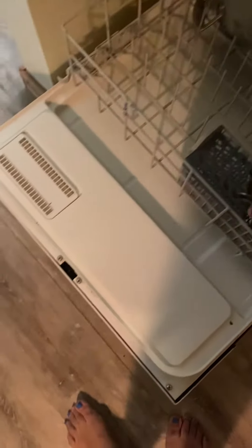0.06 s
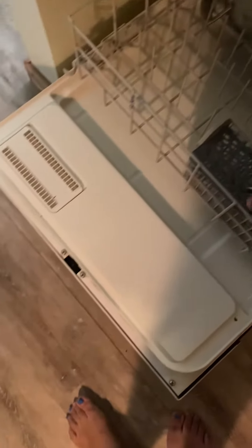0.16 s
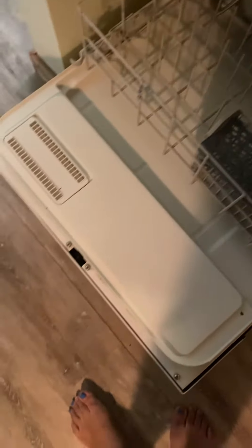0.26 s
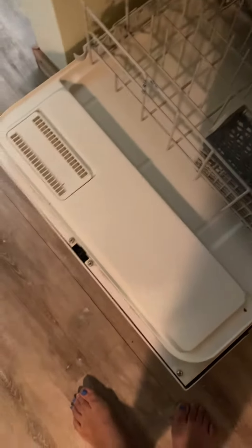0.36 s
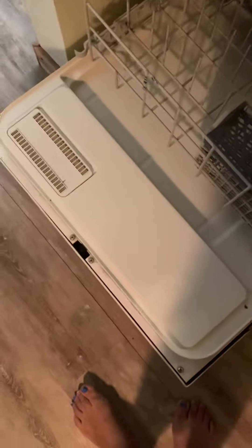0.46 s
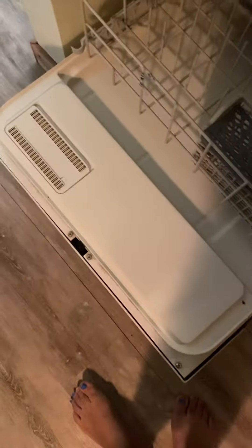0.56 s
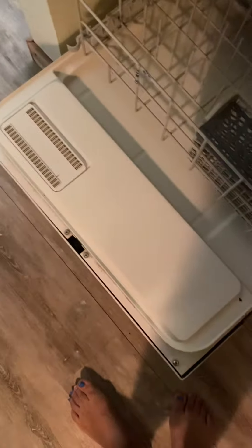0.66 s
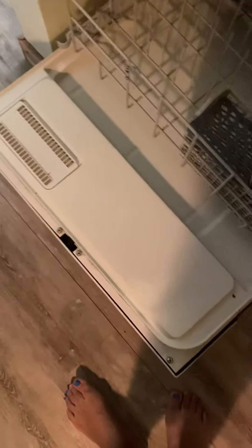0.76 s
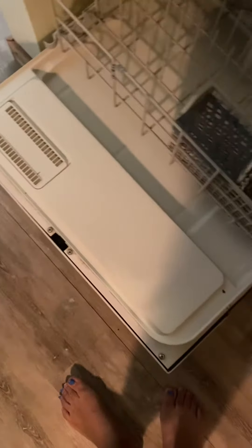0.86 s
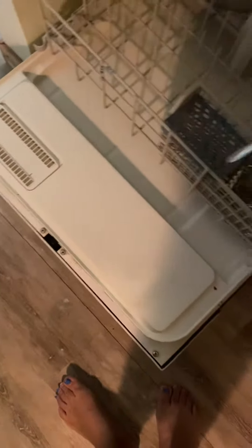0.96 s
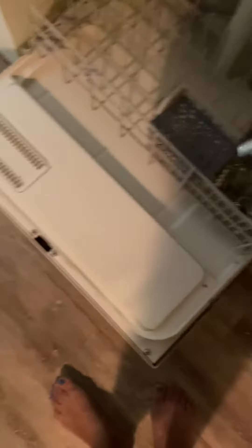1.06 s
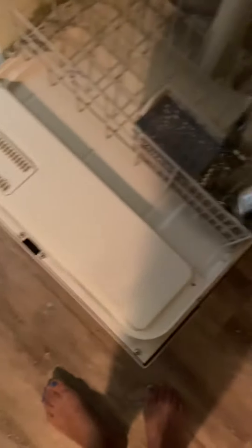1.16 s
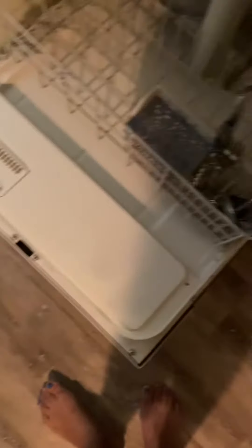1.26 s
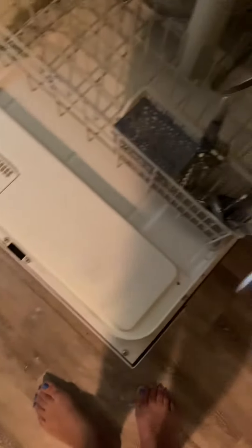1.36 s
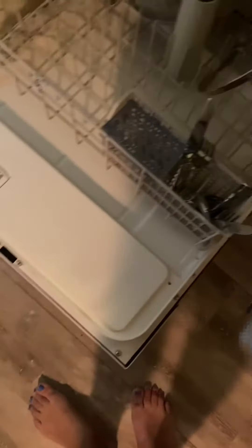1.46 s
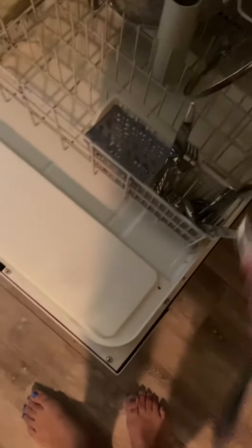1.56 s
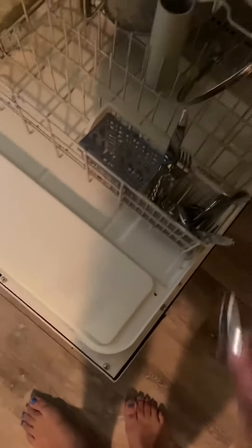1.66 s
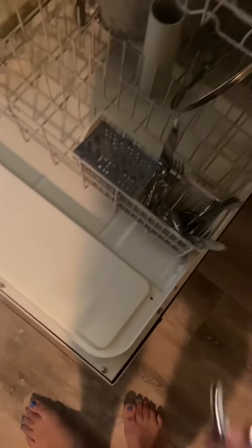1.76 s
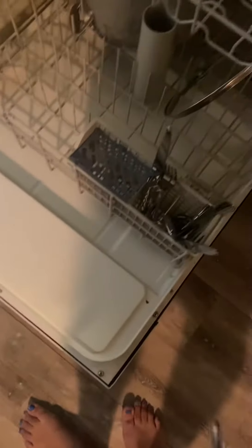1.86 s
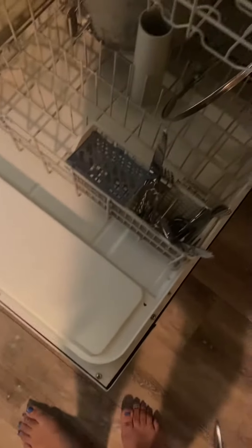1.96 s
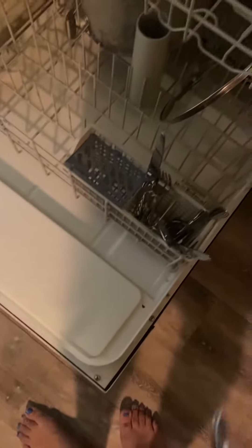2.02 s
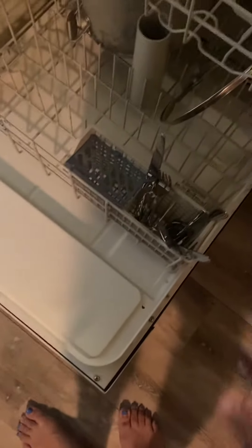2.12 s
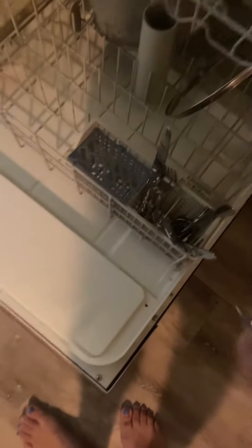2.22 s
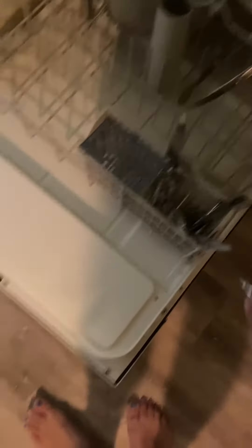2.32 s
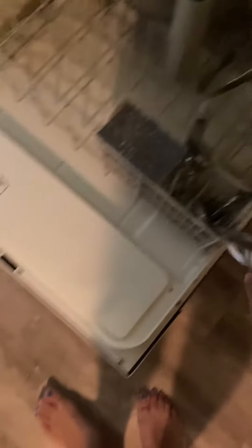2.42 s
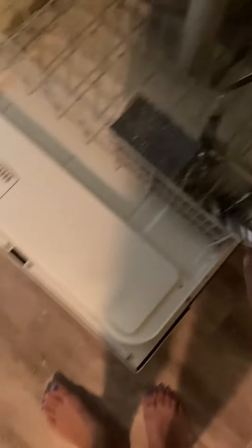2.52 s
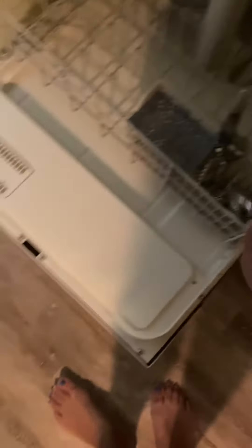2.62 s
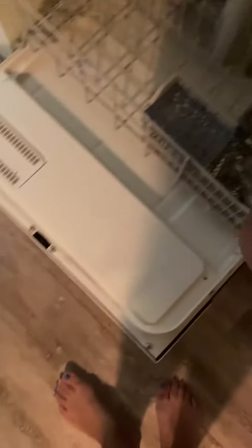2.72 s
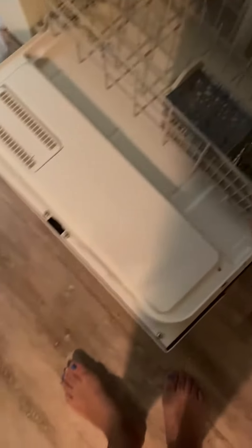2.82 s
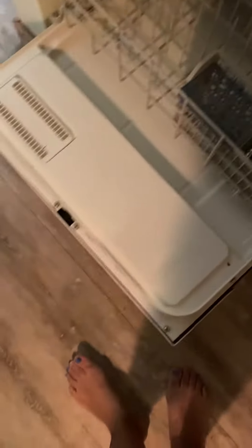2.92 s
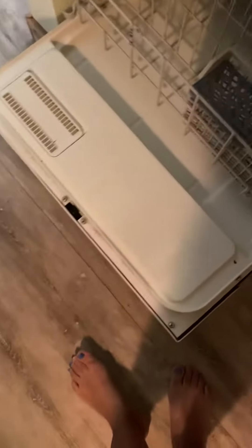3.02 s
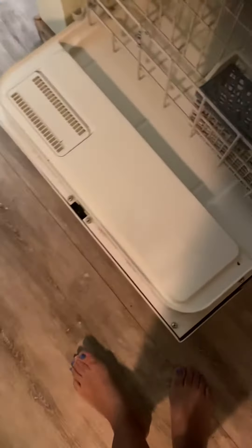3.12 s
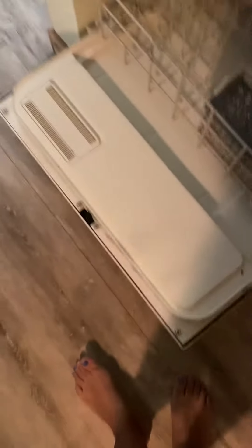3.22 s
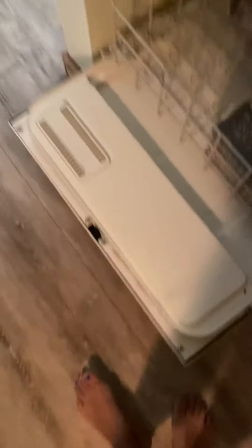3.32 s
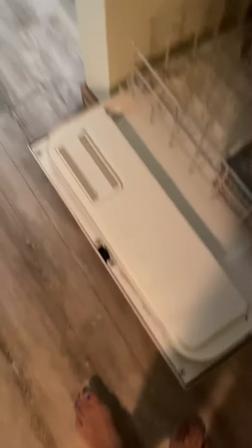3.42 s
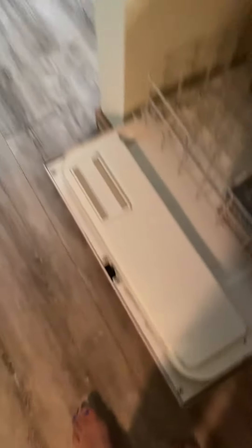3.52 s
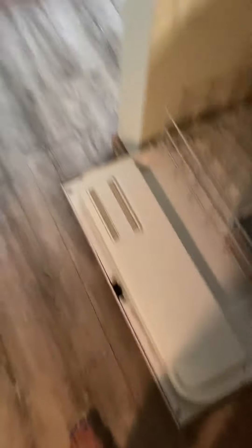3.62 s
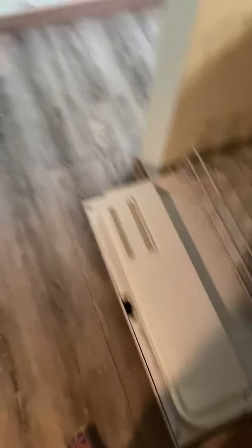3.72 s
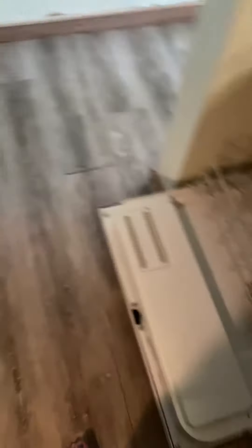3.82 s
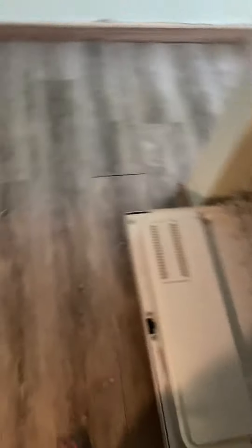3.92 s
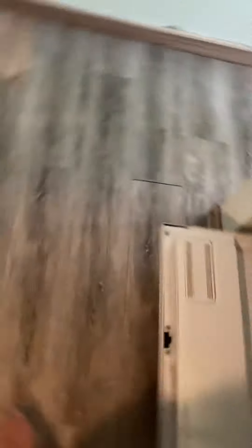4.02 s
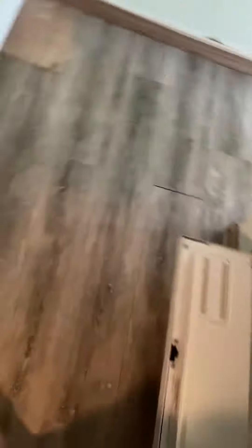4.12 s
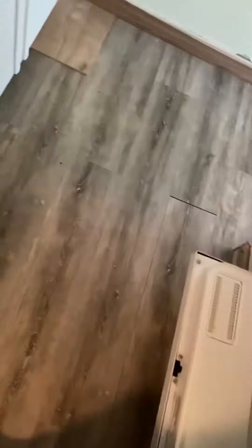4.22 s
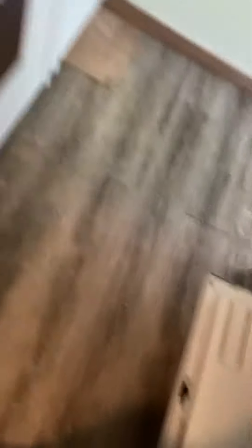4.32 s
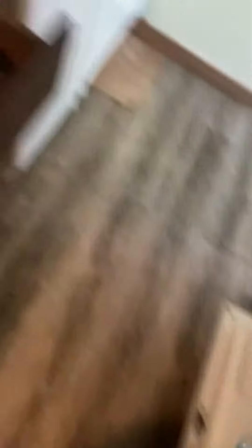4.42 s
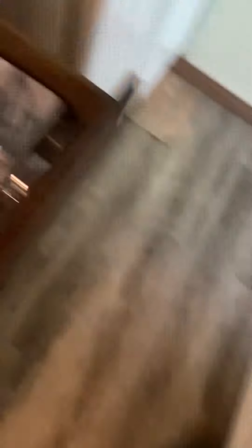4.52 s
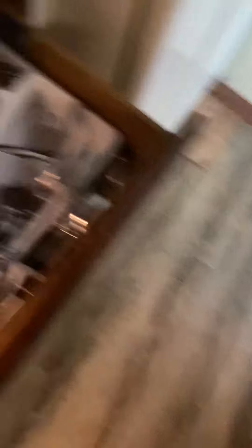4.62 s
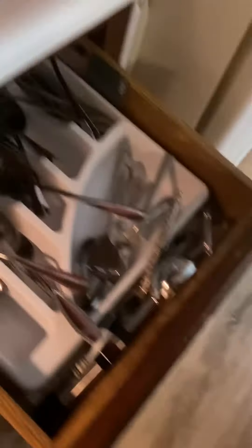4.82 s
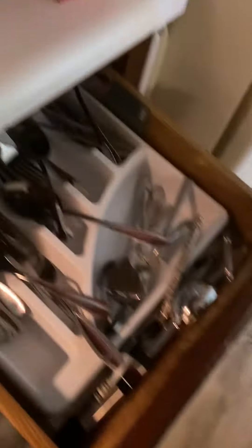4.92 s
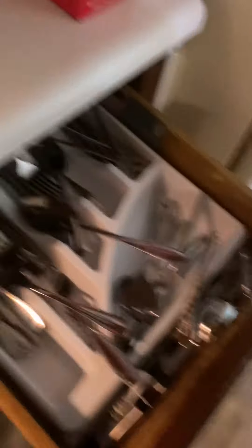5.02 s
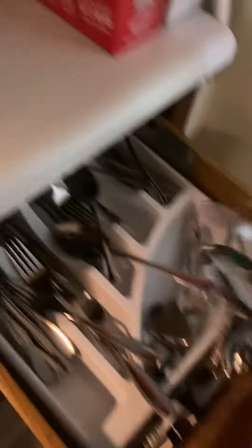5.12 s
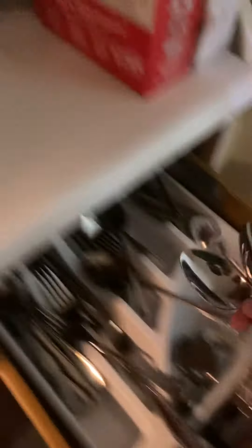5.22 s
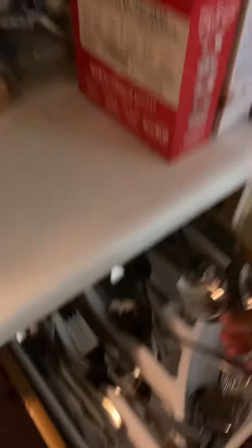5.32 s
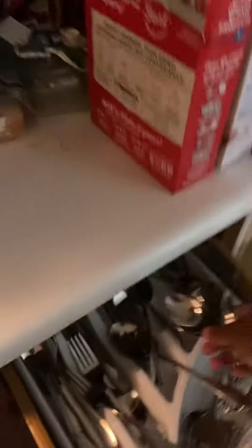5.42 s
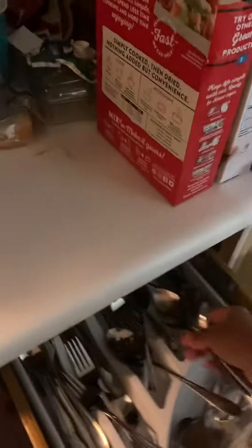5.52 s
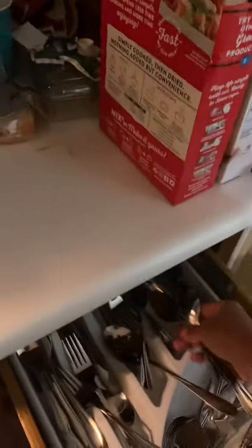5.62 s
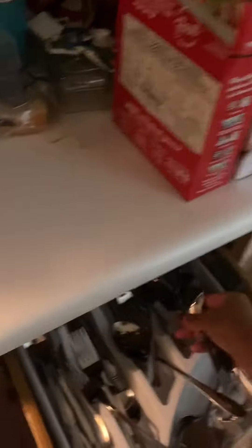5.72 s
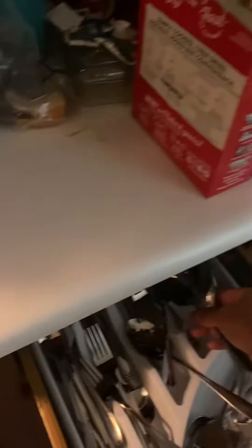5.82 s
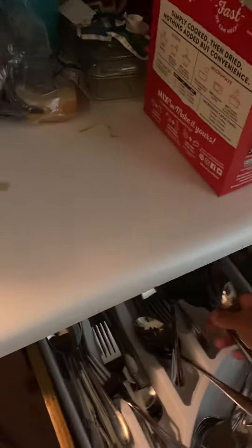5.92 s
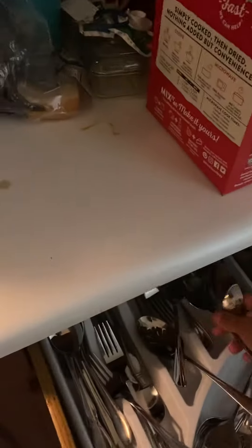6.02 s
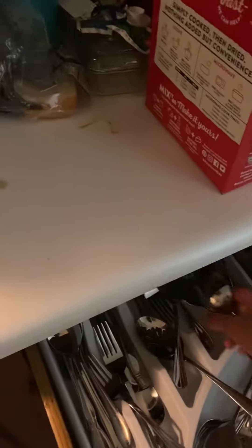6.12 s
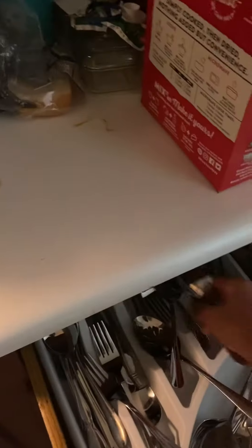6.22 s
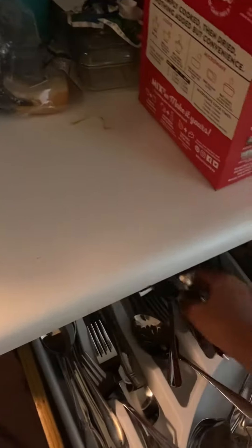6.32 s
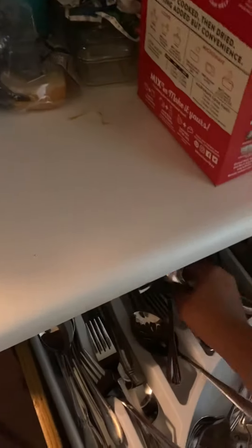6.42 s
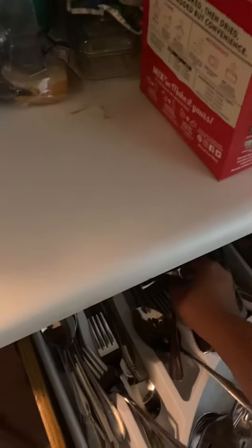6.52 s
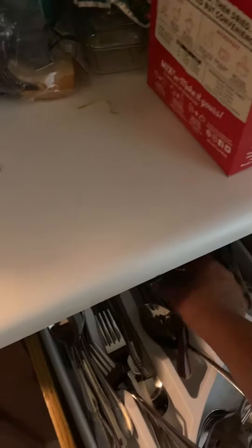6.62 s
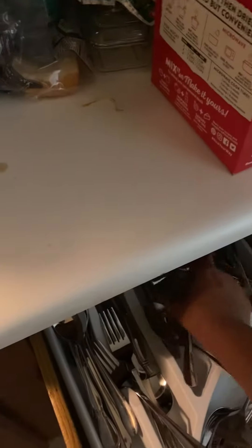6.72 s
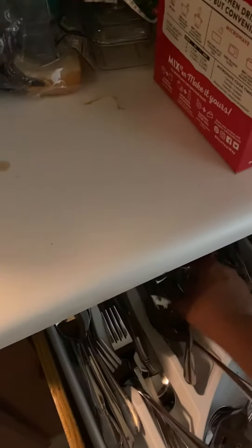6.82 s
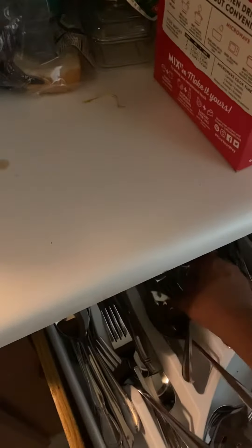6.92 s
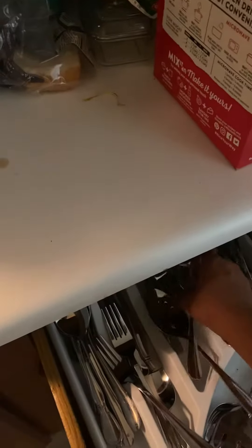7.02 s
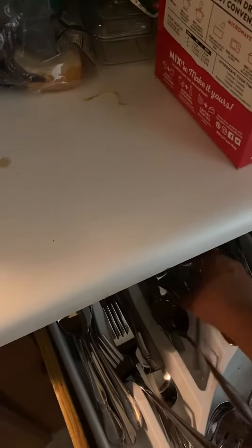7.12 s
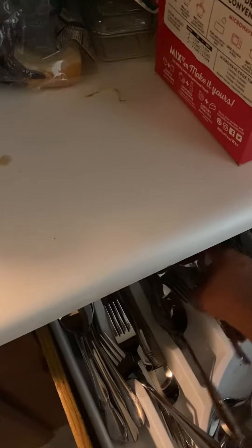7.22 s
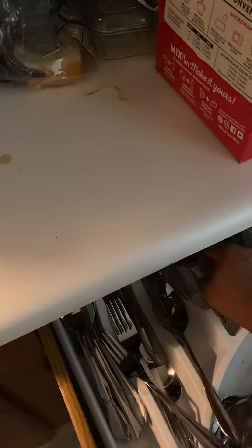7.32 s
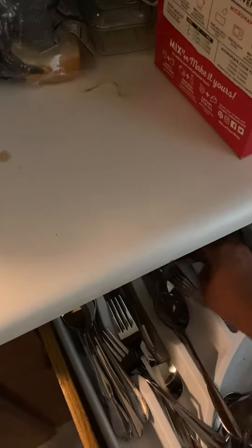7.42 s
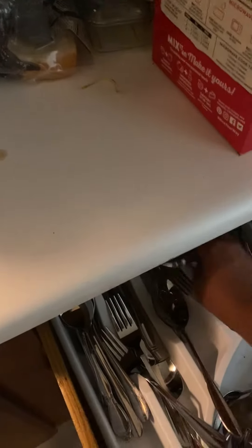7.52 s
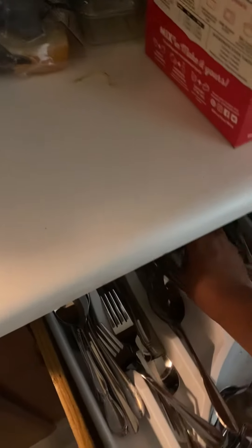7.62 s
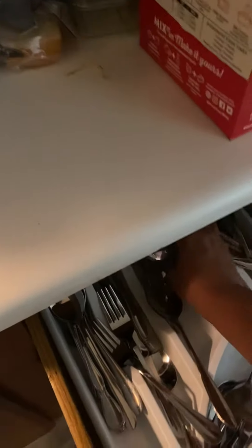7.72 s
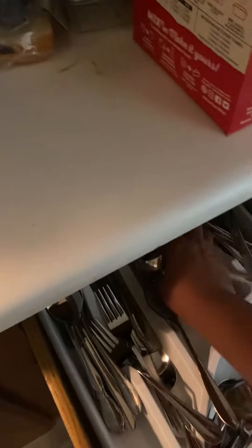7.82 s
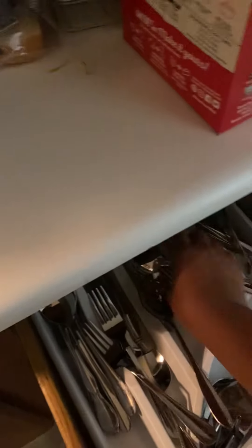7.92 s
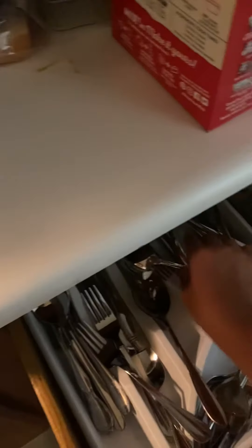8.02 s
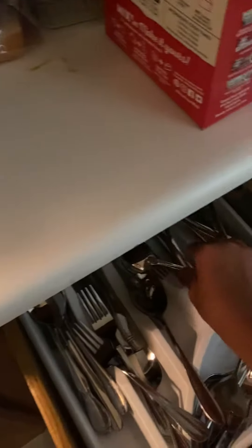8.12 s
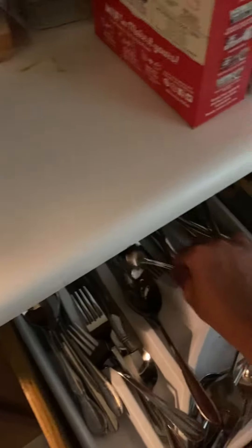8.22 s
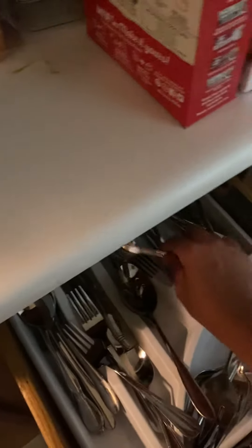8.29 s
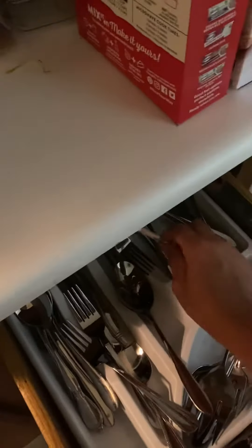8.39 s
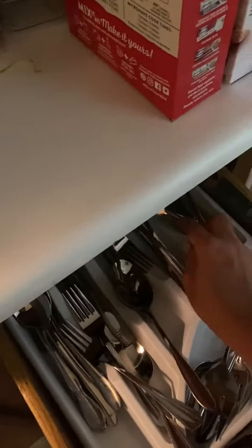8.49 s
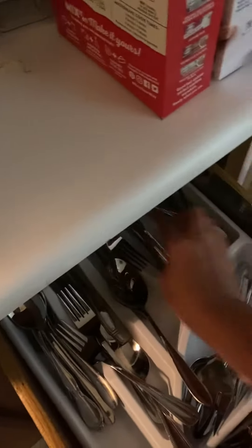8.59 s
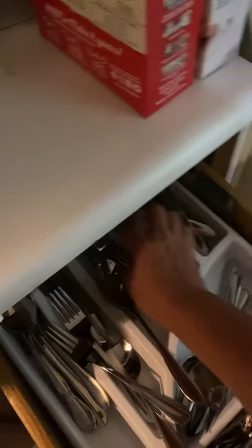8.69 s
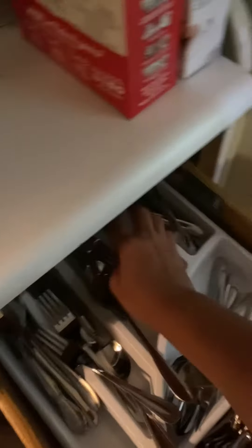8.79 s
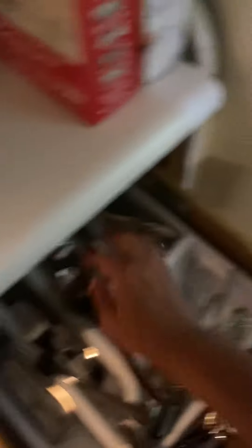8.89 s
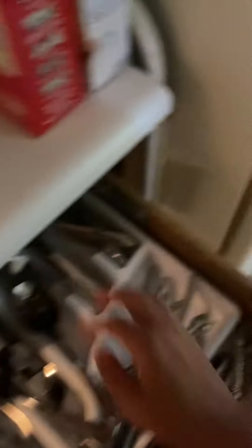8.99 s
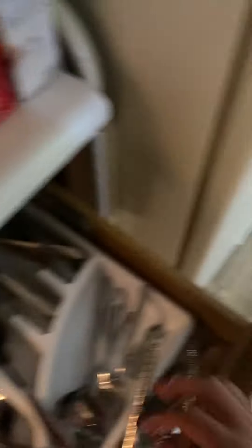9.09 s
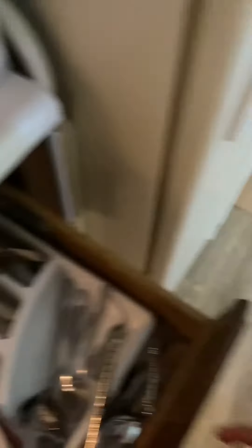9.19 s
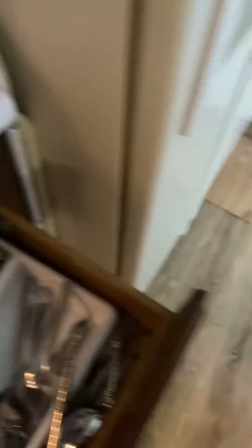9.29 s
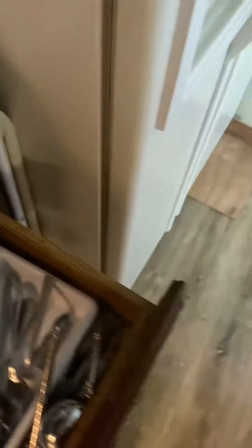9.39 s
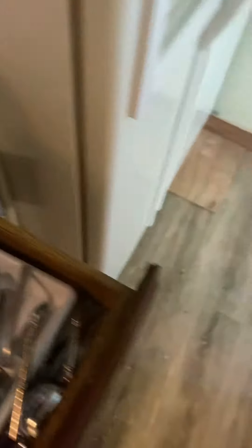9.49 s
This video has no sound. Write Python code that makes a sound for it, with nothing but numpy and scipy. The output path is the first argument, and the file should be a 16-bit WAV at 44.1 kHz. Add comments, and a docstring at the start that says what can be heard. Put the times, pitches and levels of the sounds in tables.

```python
"""A small kitchen: steel cutlery leaves a dishwasher's plastic basket and is sorted into a drawer's tray.
Each contact is a burst of tiny touches that rings the steel and knocks the plastic beneath; the room answers.
Slides tick, handles rap, brief high ticks join some contacts, free pieces sing on, and basket and drawer bump.
Wood groans softly over a low background, an appliance's hum and a faint hiss.
A hand-held phone listens; left and right drift out of phase in the treble."""
import sys
import numpy as np
from scipy import signal
from scipy.fft import rfft, irfft, next_fast_len
from scipy.io import wavfile
from scipy.ndimage import map_coordinates

SR = 44100
rng = np.random.default_rng(int(sys.argv[2]) if len(sys.argv) > 2 else 0)


def file_out(sig):
    """Save sig as 16-bit WAV at sys.argv[1]."""
    # one column per channel
    cols = np.atleast_2d(sig).T
    # limit, then scale
    lim = np.clip(cols, -1, 1)
    pcm = np.round(lim * 32767).astype(np.int16)
    wavfile.write(sys.argv[1], SR, pcm)


N = 421155
RING = np.arange(int(.34 * SR)) / SR  # the time axis of one ring (s)


def amp(db):
    """Decibels to gain."""
    return 10 ** (np.asarray(db) / 20)


def unit(x):
    """Scale to rms 1."""
    return x / np.sqrt(np.mean(x ** 2) + 1e-20)


def blow(x):
    """Scale to the energy of 30 ms at rms 1, so that short and long sounds compare."""
    return x * np.sqrt(.03 * SR / (np.mean(x ** 2) * x.shape[-1] + 1e-20))


def fade(t60):
    """An exponential decay that falls 60 dB in t60 seconds."""
    return amp(-60 * RING / t60)


def along(points, hz):
    """Join (pitch_hz, value) points on a log pitch axis."""
    f, value = np.transpose(points)
    return np.interp(np.log(hz + 1), np.log(np.sort(f) + 1), value)


def curve(rows):
    """Join (time_s, value) points into one value per sample."""
    time_s, value = np.transpose(rows)
    return np.interp(np.arange(N) / SR, time_s, value)


def wobble(rate):
    """A smooth random curve over the whole scene, with rate knots a second."""
    knots = rng.standard_normal(int(N * rate / SR) + 4)
    return map_coordinates(knots, [np.arange(N) * rate / SR])


def waver(rate, count=1):
    """Slow random swings over the length of a ring, in count separate rows."""
    knots = rng.standard_normal((count, 64))
    return np.array([np.interp(RING * rate, np.arange(64), row) for row in knots], np.float32)


def filtered(x, response):
    """Multiply the spectrum of x by a complex response of frequency."""
    n = x.shape[-1]
    m = next_fast_len(n + SR // 10, True)
    return irfft(rfft(x, m) * response(np.fft.rfftfreq(m, 1 / SR)), m)[..., :n]


def band(x, edges, order=3):
    """Keep the frequencies between two edges (Hz)."""
    return signal.sosfilt(signal.butter(order, edges, 'bandpass', fs=SR, output='sos'), x)


def body(x, modes):
    """Send x through damped resonances, as an object rings when struck; signs alternate."""
    def response(f):
        total = 0
        for k, (centre, width, db) in enumerate(modes):
            damping = 1j * f * width
            total = total + (-1) ** k * amp(db) * damping / (centre * centre - f * f + damping)
        return total
    return filtered(x, response)


def add(track, s, x):
    """Mix x into the track from time s, cut off at the track's end."""
    part = track[:, round(s * SR):][:, :x.shape[-1]]
    part += x[:, :part.shape[1]]


# How different left and right are in spread-out sound: pitch_hz, side_over_mid_db
WIDTH = [(60, -23), (200, -17), (700, -4), (1300, -6.5), (2600, -0.5), (4400, 3.5), (7000, -9.5),
         (10000, -23), (11500, -1)]


def diffuse(pair):
    """Two unrelated signals become left and right, most alike in the bass and near 10 kHz."""
    mid, side = pair[0], filtered(pair[1], lambda hz: amp(along(WIDTH, hz)))
    return np.array([mid + side, mid - side])


# How long the room's tail lasts: pitch_hz, fall_by_60_db_s
KITCHEN = [(200, 0.45), (530, 0.26), (1400, 0.26), (3700, 0.23), (9700, 0.18), (15000, 0.22)]


def kitchen(x, wet_db=-1, near_db=-3, near_t60=0.049):
    """The direct sound, a quick flurry off nearby surfaces and the room's tail."""
    hz, t, z = signal.stft(rng.standard_normal((2, len(RING))), SR, nperseg=256)
    decay = amp(-60 * t / along(KITCHEN, hz)[:, None])
    tail = signal.istft(z * decay, SR, nperseg=256)[1][:, :len(RING)]
    tail = tail * (1 - np.exp(-RING / 0.005))  # the tail builds up over some 5 ms
    near = rng.standard_normal(tail.shape) ** 3 * fade(near_t60) * (RING > .001)
    tail = amp(wet_db) * tail / np.linalg.norm(tail[0])
    near = amp(near_db) * near / np.linalg.norm(near[0])
    answer = diffuse(tail + near)
    return x + signal.fftconvolve(x[None], answer, axes=1)[:, :len(x)]


# The low background swells as the phone is carried about: time_s, level_db
RUMBLE = [(0.0, -58), (3.99, -55.5), (4.68, -52), (6.3, -55.5), (6.46, -52.5), (7.77, -52.5), (7.85, -54),
          (9.55, -51.5)]
# Tone of the low background: pitch_hz, relative_level_db
RUMBLE_COLOUR = [(15, -35), (25, -17), (54, -5), (85, -1.5), (113, 3), (145, -12), (174, 3.5), (295, -4.5),
                 (576, -15.5), (700, -13.5), (910, -44), (1540, -120)]
# Faint hiss: time_s, level_db
HISS = [(0, -65), (1.2, -64), (1.9, -61), (3.5, -62.5), (4.5, -60), (5.4, -60), (8.1, -63.5), (9.3, -60)]
# Tone of the hiss: pitch_hz, relative_level_db
AIR = [(240, -26), (400, 2.5), (644, -9), (991, -8), (1350, -10.5), (3200, -15.5), (4750, -23), (5600, -17),
       (6800, -20), (8500, -31.5), (14000, -72)]
# The appliance's hum, before its swells: pitch_hz, level_db
HUM = [(59.5, -62.5), (119, -63.5), (178.5, -75.5)]


def background():
    """Shaped noise makes the low room and handling sound and the hiss; unsteady sines make the hum."""
    def noise(colour):
        return unit(diffuse(filtered(rng.standard_normal((2, N)), lambda hz: amp(along(colour, hz)))))
    level, hiss = curve(RUMBLE), curve(HISS)
    t = np.arange(N) / SR
    hum = 0
    for hz, db in HUM:
        tone = unit(np.sin(2 * np.pi * hz * t + .7 * wobble(4)))
        hum = hum + amp(db + 1.5 * wobble(4)) * tone
    nearness = amp(2.3 * (level - level.mean()))  # louder by the drawer: the hum follows the low background
    rumble = amp(level + 1.1 * wobble(6.5)) * noise(RUMBLE_COLOUR)
    return rumble + nearness * hum + amp(hiss + 2.0 * wobble(7.2)) * noise(AIR)


def chatter(loose, shortest_s=0.00022, stretch=4.35):
    """A firm tap is over at once; a loose piece skids and touches again for some tens of milliseconds."""
    u = RING / (shortest_s * np.exp(stretch * np.clip(loose, 0, 1)))
    return rng.standard_normal(len(RING)) ** 3 * u * np.exp(-u)


REBOUND_S = 0.017  # between the two touches of a piece


def touch_twice(loose, rebound_db):
    """The force of a contact: one end of the piece touches, then the other."""
    first = unit(chatter(loose))
    second = np.pad(unit(chatter(loose)), (round(REBOUND_S * SR), 0))[:len(RING)]
    return first + amp(rebound_db) * second


# Steel meets steel in basket or hand: time_s, strength_db, brightness_db,
# looseness (0 = firm tap, 1 = rattling slide)
CLINKS = [(0.202, -44.5, 1.5, 0.6), (0.235, -33.5, 2, 0.21), (0.397, -36.5, 5, 0.71),
          (0.463, -37.5, 5.5, 0.5), (0.571, -24, 3, 0.79), (0.601, -29, 7.5, 0.85), (0.715, -24, 6, 0.76),
          (0.827, -26.5, 2.5, 0.71), (1.54, -32.5, 1, 0.3), (1.577, -31, -2.5, 0.079),
          (1.592, -40, -2, 0.45), (1.945, -38.5, -3, 0.093), (2.032, -40, -0.5, 0.079),
          (2.078, -38.5, -3.5, 0.064), (2.112, -41.5, -3, 0.18), (2.165, -39, -2.5, 0.42),
          (2.283, -43, -1.5, 0.39), (2.364, -41, 1.5, 0.6), (2.515, -55.5, -4.5, 0.41),
          (2.77, -47, 6, 0.54), (2.819, -43, 7, 0.75), (2.974, -44, 4, 0.72), (2.995, -36.5, -10.5, 0.82),
          (3.176, -41.5, 4, 0.96), (3.387, -49.5, 6.5, 0.34), (3.414, -47, 0.5, 0.52),
          (3.691, -27.5, -7, 0.24), (3.736, -39, -8, 0.48), (3.924, -55, -18.5, 0.46),
          (4.003, -37, -2, 0.51), (4.121, -22.5, -1, 0.7), (4.144, -33, 6.5, 0.27),
          (4.16, -27.5, -0.5, 0.45), (4.323, -46, 0.5, 0.14), (4.379, -40.5, 0.5, 0.16),
          (4.745, -40, -3, 0.2), (4.837, -36, 2.5, 0.62), (4.91, -31, -3.5, 0.66), (4.956, -28.5, -2, 0.46),
          (4.983, -39, 2, 0.31), (5.07, -34, 0, 0.35), (5.103, -50, -6, 0.34), (5.117, -37, -3, 0.62),
          (5.133, -34, 0, 0.28), (5.189, -38, -2.5, 0.27), (5.268, -38, -2.5, 0.23),
          (5.442, -35, 4.5, 0.63), (5.614, -49, 2.5, 0.29), (5.921, -38, -2, 0.14)]
# Balance of a clink: clank_db, clink_db, sparkle_db; brightness tips it from the first to the last
CLINK_COLOUR_DB = [-5.5, -1.5, -10.5]
CLINK_KNOCK_DB = -24  # little of a clink reaches the plastic
CLINK_REBOUND_DB, LOOSE_REBOUND_DB = -26.5, 31.5  # second touch if firm; how much is added when fully loose
# A piece lands in the tray, one end first: time_s, steel_db, tray_db, looseness (0-1), second_over_first_db
DROPS = [(5.507, -31, -43.5, 0.11, -5), (5.648, -28.5, -41, 0.35, -5), (5.874, -40, -47.5, 0.73, -15),
         (6.274, -32, -54.5, 0.7, -5), (6.299, -17.5, -23, 0.55, 1), (6.313, -22, -31.5, 0.86, 9),
         (6.394, -47, -28.5, 0.08, -13), (6.464, -34.5, -34, 0.48, -29), (6.509, -33.5, -36, 0, -28),
         (6.574, -28.5, -31, 0.5, -3), (6.636, -34, -34.5, 0.38, -27), (6.677, -32, -30, 0.35, 4.5),
         (6.747, -37.5, -29, 0.03, -5.5), (6.845, -37.5, -34, 0.47, -2), (6.911, -25.5, -26.5, 0.52, -1.5),
         (7.049, -34, -36, 0.46, -10), (7.078, -48, -38, 0.47, -7), (7.108, -45.5, -33.5, .3, 7),
         (7.143, -36.5, -42.5, 0.2, -6), (7.185, -27, -33.5, 0.6, 5), (7.235, -34, -37.5, 0.35, -24),
         (7.265, -54.5, -43, 0.8, 3), (7.329, -42, -36, 0.2, 3.5), (7.351, -25, -27, 0.47, -1.5),
         (7.437, -35, -33, 0.7, -1), (7.474, -36, -37, 0.5, -10), (7.517, -35.5, -38.5, 0.4, -30),
         (7.556, -27.5, -30.5, 0.5, -2), (7.607, -24.5, -22.5, 0.1, -10), (7.704, -35.5, -29, 0.8, -3),
         (7.734, -33, -28, 0.57, -17), (7.756, -26, -25.5, 0.3, -9), (7.793, -26, -24.5, 0.79, -8.5),
         (7.841, -28, -31, 0.59, -10), (7.858, -20.5, -30, 0.1, -7.5), (8.172, -40.5, -39.5, 0.3, -20),
         (8.213, -33, -38.5, 0.2, -36), (8.489, -23, -29.5, 0.1, -16.5), (8.625, -23.5, -21.5, 0.21, -8),
         (8.68, -17, -25, 0.52, -11), (8.712, -30.5, -31.5, 0.6, -5), (8.841, -45.5, -47.5, 0.34, -23)]
# Balance of a drop: clank_db, clink_db, sparkle_db
DROP_COLOUR_DB = [-4.5, -2, -10.5]


def contacts():
    """Every clink and drop as (time s, knock dB, dB of each register, looseness, rebound dB)."""
    found = []
    for s, db, bright, loose in CLINKS:
        register_db = db + np.add(CLINK_COLOUR_DB, bright * np.array([-1, 0, 1]))
        rebound_db = CLINK_REBOUND_DB + LOOSE_REBOUND_DB * loose
        found.append((s, db + CLINK_KNOCK_DB, register_db, loose, rebound_db))
    for s, db, knock_db, loose, rebound_db in DROPS:
        found.append((s, knock_db, db + np.array(DROP_COLOUR_DB), loose, rebound_db))
    return found


# Ringing notes of forks and spoons, before random spread and choking: pitch_hz, level_db, fall_by_60_db_s
STEEL = [(2740, -4.5, 0.12), (2920, 5.5, 0.028), (3450, -20, 0.06), (3710, -1, 0.14), (3680, 6, 0.081),
         (4340, -15, 0.24), (5530, -4, 0.28), (5820, -2, 0.13), (5726, 17, 0.022), (5900, -18, 0.072),
         (6270, 13, 0.019), (6740, -1, 0.17), (6764, 13.5, 0.03), (7390, -2, 0.24), (9600, -7.5, 0.06),
         (10050, -1, 0.064), (9260, 4, 0.04), (9950, 8, 0.17)]


def steel(loose, modes_db=-9, free_db=4, crack_t60=0.0079, buzz_db=-10.0, buzz_t60=0.27,
          scatter_db=4, size_spread=0.024, uneven_db=3):
    """A piece of cutlery: a crack, a buzz of steel on steel, and uneven ringing modes, stronger when it is loose."""
    hz, db, t60 = np.transpose(STEEL)[:, :, None]
    scatter, detune = rng.standard_normal((2, len(STEEL), 1))
    t = RING.astype(np.float32)
    # no two pieces are quite alike: all notes shift together, and each a little alone
    pitch = hz * (1 + size_spread * rng.standard_normal() + 0.013 * detune)
    turns = (2 * np.pi * pitch).astype(np.float32)
    decay = np.exp(-(np.log(1000) / t60).astype(np.float32) * t)
    modes = np.sum(amp(db + scatter_db * scatter).astype(np.float32) * decay * np.sin(turns * t), 0)
    modes = modes * amp(uneven_db * waver(60)[0])
    crack, buzz = rng.standard_normal((2, len(RING))) * [fade(crack_t60), fade(buzz_t60)]
    return amp(modes_db + free_db * loose) * blow(modes) + blow(crack) + amp(buzz_db) * blow(buzz)


# The clank, clink and sparkle registers: low_edge_hz, high_edge_hz
REGISTERS = [(2450, 4450), (5100, 8000), (8700, 10600)]
# Resonances of the plastic tray in its wooden drawer: pitch_hz, width_hz, level_db
TRAY = [(527, 13, 3), (769, 110, 9.5), (870, 77, 9.5), (1056, 204, 6.5), (1376, 120, 8.5), (1638, 396, 7.5)]


def cutlery(thump_db=-15, choked_t60=0.55, press_range_db=24, tick_db=-21, flurry_db=7):
    """Each contact rings the steel, brighter or duller with the spot it hits, and knocks what lies beneath."""
    out = np.zeros((2, N))
    for s, knock_db, register_db, loose, rebound_db in contacts():
        push = touch_twice(loose, rebound_db)
        # pushed into the tray, a piece is choked
        pressed = np.clip(-0.5 + (knock_db - max(register_db)) / press_range_db, .01, 1)
        ring = signal.fftconvolve(push, steel(loose) * fade(choked_t60 / pressed))[:len(RING)]
        ring = kitchen(ring, wet_db=-7.5, near_db=0.0 + flurry_db * loose, near_t60=0.06)
        for edges, db in zip(REGISTERS, register_db):
            add(out, s, amp(db) * blow(band(ring, edges, order=4)))
        landing = kitchen(push, wet_db=-3.5, near_db=-1.5, near_t60=0.08)
        # the bare touch, above the ring
        tick = band(kitchen(push, wet_db=-23.0, near_db=-16.5) * fade(0.022), (11000, 15500))
        add(out, s, amp(register_db[-1] + tick_db) * blow(tick))
        spot = np.exp(0.067 * rng.standard_normal())  # each spot of the tray has its own pitch
        knock = band(body(landing, TRAY * np.array([spot, 1, 1])), (450, 2300), order=2)
        thump = band(landing, (60, 480), order=2)  # the wooden drawer takes the weight
        add(out, s, amp(knock_db) * (blow(knock) + amp(thump_db) * blow(thump)))
    return out


# The hand drags pieces over each other: start_s, end_s, steel_db, plastic_beneath_db
SLIDES = [(0.22, 0.43, -60, -53), (0.365, 0.567, -47.5, -55), (0.602, 0.875, -39, -54.5),
          (1.31, 1.424, -63, -64), (1.404, 1.524, -55.5, -64), (2.083, 2.26, -50, -63),
          (2.38, 2.664, -61, -71), (2.754, 2.933, -55, -54), (3.016, 3.259, -47, -49),
          (3.407, 3.535, -54.5, -81), (3.852, 4.01, -55.5, -66), (4.48, 4.618, -51, -57),
          (4.85, 5.15, -47.5, -55.5), (5.17, 5.253, -71, -61), (5.414, 5.574, -39.5, -68),
          (5.845, 6.25, -46.5, -65.5), (6.243, 6.3, -32.5, -58.5), (6.513, 6.81, -44, -42),
          (6.97, 7.326, -48, -43.5), (7.411, 7.69, -36, -37.5), (7.694, 7.86, -28, -37),
          (8.04, 8.079, -59, -43.5), (8.138, 8.207, -49, -37), (8.595, 8.793, -35, -39),
          (9.426, 9.542, -55.5, -64.5)]
SLIDE_EDGE_S = 0.022  # a slide swells and stops over this time
SETTLE_DB, SETTLE_S = -9, 0.068  # loose neighbours shift on after a contact: level under it, decay time


def unrest():
    """How hard pieces rub on steel and plastic: the hand slides them, and they settle after loose contacts."""
    t = np.arange(N) / SR
    power = np.zeros((2, N))
    for start, end, *slide_db in SLIDES:
        swell = np.clip(np.minimum(t - start, end - t) / SLIDE_EDGE_S, 0, 1)
        power += amp(slide_db)[:, None] ** 2 * swell
    for s, knock_db, register_db, loose, _ in contacts():
        settle_db = SETTLE_DB + np.array([[max(register_db)], [knock_db]])
        add(power, s, (loose * amp(settle_db) * np.exp(-RING / SETTLE_S)) ** 2)
    return np.sqrt(power)


# Resonances of the basket and its wire rack: pitch_hz, width_hz, level_db
BASKET = [(333, 25, 7.5), (438, 35, 8), (524, 110, 4), (926, 47, 4.5), (1493, 34, -4.5), (1890, 50, -4.5),
          (2376, 160, -7), (3260, 60, -14.5), (4600, 80, -12.5)]
BASKET_UNTIL_S = 3.6  # the pieces lie in the basket until then, afterwards in the tray


def jostle(rate=60, spread_db=32, count=3):
    """Moving pieces touch at random, rate times a second each, on a changing few of them and the plastic below."""
    out, moving = np.zeros((2, N)), unrest()

    def held(stroke):
        """The strength of a stretch of rubbing, on the scale of blow()."""
        return np.sqrt(np.sum(stroke ** 2) / (.03 * SR))

    for start in range(0, N, len(RING)):
        on_steel, on_plastic = moving[:, start:start + len(RING)]
        shape = (count, len(on_steel))
        touches = (rng.random(shape) < rate / SR) * amp(-spread_db * rng.random(shape))
        ring = sum(signal.fftconvolve(touch * on_steel, steel(1.0) * fade(0.86)) for touch in touches)
        ring = band(kitchen(ring, wet_db=1.5), (2800, 8500), order=4)
        plastic = BASKET if start < BASKET_UNTIL_S * SR else TRAY
        scrape = np.pad(touches.sum(0) * on_plastic, (0, SR // 8))  # room for the plastic to ring out
        scrape = kitchen(body(scrape, plastic), wet_db=-3.5)
        scrape = band(scrape, (300, 5000), order=2)
        add(out, start / SR, held(on_steel) * blow(ring))
        add(out, start / SR, held(on_plastic) * blow(scrape))
    return out


# A piece left free rings on with a note of its own: start_s, pitch_hz, level_db, fall_by_60_db_s
CHIMES = [(0.235, 5900, -42, 0.24), (0.571, 9445, -27, 0.17), (0.571, 10100, -27, 0.09),
          (0.573, 6890, -31, 0.16), (0.602, 5730, -38, 0.089), (0.73, 9060, -29.5, 0.12),
          (0.827, 5410, -25, 0.11), (0.826, 5660, -36, 0.07), (1.54, 6110, -37.5, 0.22),
          (1.542, 6690, -34, 0.21), (1.578, 6140, -35, 0.19), (1.541, 2850, -38, 0.043),
          (1.541, 3780, -43, 0.036), (1.578, 2735, -39, 0.14), (1.58, 3320, -45, 0.06),
          (2.032, 2530, -39.5, 0.018), (2.08, 2880, -51, 0.22), (2.363, 2728, -45, 0.28),
          (3.414, 2750, -54.5, 0.12), (3.691, 5440, -34.5, 0.021), (3.691, 2790, -35, 0.026),
          (3.691, 3250, -31.5, 0.022), (3.738, 3500, -37, 0.074), (4.124, 3747, -27, 0.14),
          (4.123, 5660, -27.5, 0.071), (4.129, 10420, -29, 0.13), (4.16, 6730, -32, 0.13),
          (4.842, 5620, -37, 0.28), (4.911, 6830, -34, 0.13), (4.958, 7540, -38, 0.15),
          (5.129, 6510, -32.5, 0.034), (5.441, 6750, -42, 0.15), (5.92, 3770, -57, .35),
          (6.131, 3720, -48, 0.39), (6.255, 6000, -37.5, 0.23), (6.275, 3840, -42, .14),
          (6.314, 3790, -22, 0.088), (6.314, 6680, -22.5, 0.068), (6.325, 5720, -24, 0.048),
          (6.575, 8830, -36, 0.28), (6.925, 6530, -29, 0.3), (7.185, 3754, -33, 0.13),
          (7.351, 6600, -32.5, 0.054), (7.791, 4220, -28.5, 0.18), (8.213, 7580, -39.5, 0.034),
          (8.682, 6660, -23, .16), (8.682, 9000, -25.5, 0.19), (8.576, 4060, -37.5, 0.09),
          (8.729, 5520, -28, 0.14), (8.745, 7620, -33.5, .13)]


def chimes(uneven_db=4.5, waver_per_s=70, drift=0.48):
    """A piece sings on; a twin mode makes it beat, and neighbours brushing it make it die unevenly."""
    out = np.zeros((2, N))
    for s, hz, db, t60 in CHIMES:
        swell, slip, twin_slip = waver(waver_per_s, count=3)
        twin_hz = hz + rng.normal(0, 55)
        tone = np.sin(2 * np.pi * hz * RING + drift * slip)
        tone += 0.4 * np.sin(2 * np.pi * twin_hz * RING + drift * twin_slip)
        tone *= amp(uneven_db * swell) * fade(t60) * (1 - np.exp(-RING / 0.0011))
        add(out, s, amp(db) * blow(kitchen(tone, wet_db=-7.0, near_db=-11.5)))
    return out


def bumps(rows, modes, gain_db, loose, thud_db, note_db, note_width_hz, rattle_top_hz):
    """Rattling blows on a box: the spot decides which note stands out, and what carries the box thuds."""
    out = np.zeros((2, N))
    for s, db, note_hz, rattle_db in rows:
        push = kitchen(chatter(loose), wet_db=0.0)
        thud = band(push, (70, 350), order=2)
        rattle = band(push, (480, rattle_top_hz), order=4)
        box = band(body(push, modes), (100, 6000), order=2)
        note = kitchen(body(chatter(loose), [(note_hz, note_width_hz, 0)]))
        blend = blow(box) + amp(note_db) * blow(note) + amp(thud_db) * blow(thud) + amp(rattle_db) * blow(rattle)
        add(out, s, amp(db + gain_db) * blend)
    return out


# The basket bumps in its wire rack: time_s, level_db (before gain_db), strongest_note_hz, rattle_over_box_db
BUMPS = [(0.27, -41, 321, 0), (0.603, -37.5, 336, -4), (0.638, -33.5, 399, -5.5), (0.869, -46.5, 346, -1.5),
         (2.772, -35.5, 337, -2), (2.998, -26.5, 893, 2), (3.01, -31, 340, -6.5), (3.2, -46.5, 361, 0)]


def basket_bumps():
    """The plastic basket knocks loosely in its rack, with a clear note and a bright rattle."""
    return bumps(BUMPS, BASKET, gain_db=-5.0, loose=0.89, thud_db=-11.0, note_db=0.5,
                 note_width_hz=23, rattle_top_hz=4970)


# Brief high ticks: time_s, level_db (before tick_db)
HIGH_TICKS = [(0.571, -44.5), (0.73, -48), (4.957, -48), (5.132, -49.5), (5.65, -48), (6.314, -43.5),
              (7.236, -45.5), (7.368, -51.5), (7.858, -47), (8.487, -46.5), (8.679, -39.5)]


def high_ticks(tick_db=-2, loose=0.11):
    """Short bursts of treble noise with some of the contacts."""
    out = np.zeros((2, N))
    for s, db in HIGH_TICKS:
        tick = band(kitchen(chatter(loose), wet_db=-14, near_db=-1.5), (9500, 14000), order=2)
        add(out, s, amp(db + tick_db) * blow(tick))
    return out


# A handle raps the plastic of basket or tray: time_s, pitch_hz, level_db (before rap_db)
RAPS = [(1.542, 1780, -60), (1.577, 1640, -49.5), (2.733, 880, -56), (4.957, 1700, -61), (5.072, 1990, -53),
        (5.133, 1790, -47), (5.272, 2250, -57), (5.506, 1410, -38.5), (5.65, 1400, -40.5),
        (5.669, 1720, -40.5), (6.393, 1260, -41), (6.463, 717, -26.5), (6.749, 1490, -35.5),
        (6.917, 1090, -24), (7.608, 683, -27.5), (7.704, 1150, -30), (7.793, 980, -25.5),
        (7.843, 556, -22.5), (7.858, 1150, -27), (8.625, 990, -18)]


def raps(rap_db=-1, width_share=0.19, overtone=1.706, overtone_db=-5, loose=0.22):
    """A handle's end hits a plastic wall: a short hollow note, its pitch set by the spot."""
    out = np.zeros((2, N))
    for s, hz, db in RAPS:
        wall = [(hz, width_share * hz, 0), (overtone * hz, width_share * hz, overtone_db)]
        note = band(body(chatter(loose), wall), (350, 3500), order=2)
        add(out, s, amp(db + rap_db) * blow(kitchen(note, wet_db=-7.5, near_db=-1.5)))
    return out


# Soft groans of rubbing wood: middle_s, length_s, level_db (of the rub; the shudder adds to it)
GROANS = [(3.82, 0.042, -51.5), (4.577, 0.068, -46), (5.209, 0.09, -45.5), (5.79, 0.22, -54),
          (8.132, 0.023, -39), (9.034, 0.38, -56.5)]


def groans(pitch_hz=600, width_hz=130, shudder_db=-5):
    """Sliding wood rubs one narrow resonance and sets the cabinet shuddering."""
    t = np.arange(N) / SR
    stroke = sum(amp(db) * np.exp(-(2 * (t - s) / length) ** 2) for s, length, db in GROANS)
    mode = [(pitch_hz, width_hz, 0)]
    rub = rng.standard_normal((2, N))
    groan = unit(diffuse(body(body(rub, mode), mode)))
    shudder = unit(band(rub[0], (30, 260), order=2))
    return stroke * (groan + amp(shudder_db) * shudder)


# The drawer is nudged in its frame: time_s, level_db (before gain_db), strongest_note_hz, rattle_over_box_db
NUDGES = [(7.628, -23, 690, -10.5), (7.842, -30.5, 537, -9), (8.335, -23, 689, -15.5),
          (8.377, -29.5, 820, -10.5), (8.625, -18.5, 924, -16)]
# Resonances of its wooden box: pitch_hz, width_hz, level_db
DRAWER = [(406, 330, -9), (680, 27, 3.5), (724, 11, -2), (902, 41, -1), (1060, 63, -6)]


def drawer_nudges():
    """The wooden drawer knocks in its frame: firmer and duller than the basket."""
    return bumps(NUDGES, DRAWER, gain_db=-6, loose=0.49, thud_db=-19.5, note_db=-14,
                 note_width_hz=34, rattle_top_hz=1500)


def scene():
    """All sounds of the pieces and the wood, a little to the right, over the background."""
    boxes = basket_bumps() + drawer_nudges()
    handled = cutlery() + raps() + high_ticks() + chimes() + jostle() + boxes + groans()
    return handled * amp([[-.5], [.5]]) + background()  # left and right in dB


# Left-right phase difference by pitch: pitch_hz, left_lead_radians
PHASE = [(100, 0), (4500, 0), (6300, .65), (8000, 1.2), (9900, 2.1), (10900, 3.05)]
TOP_HZ = 16200  # nothing is kept above this


def record(dry):
    """Left and right drift out of phase in the treble; the top is cut off sharply."""
    shifted = filtered(dry, lambda hz: np.exp(.5j * along(PHASE, hz) * np.array([[1], [-1]])))
    return filtered(shifted, lambda hz: hz < TOP_HZ)


dry = scene()
out = record(dry)
file_out(out)
```